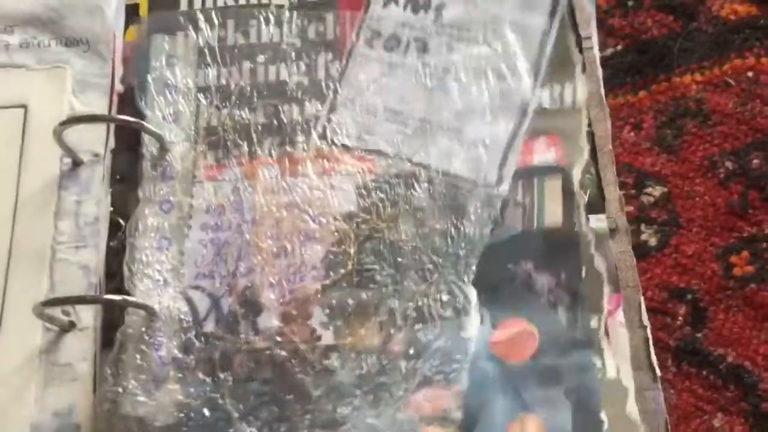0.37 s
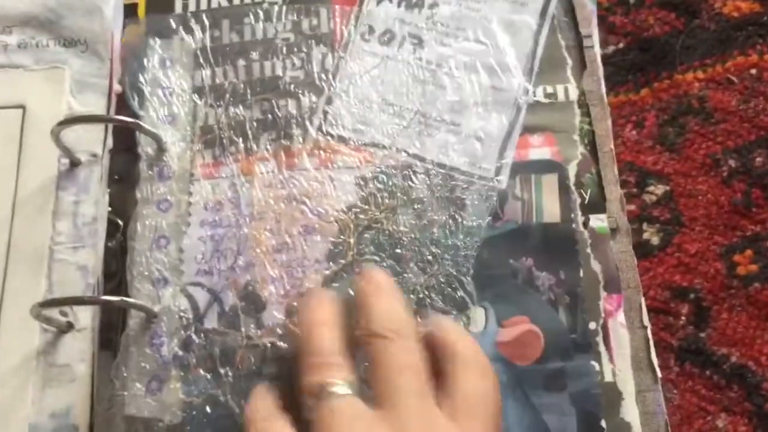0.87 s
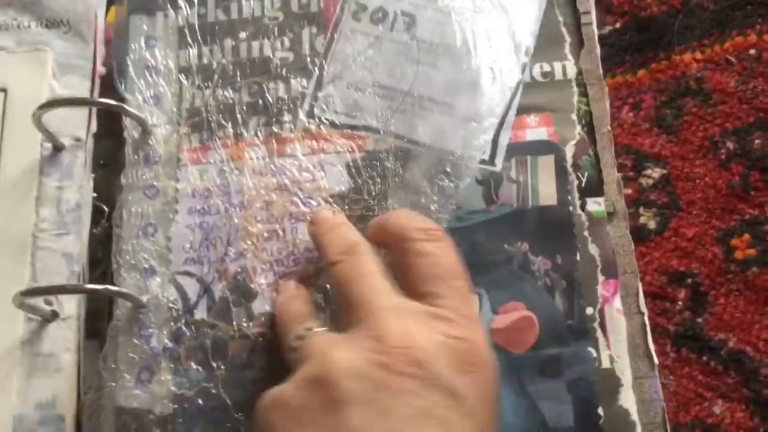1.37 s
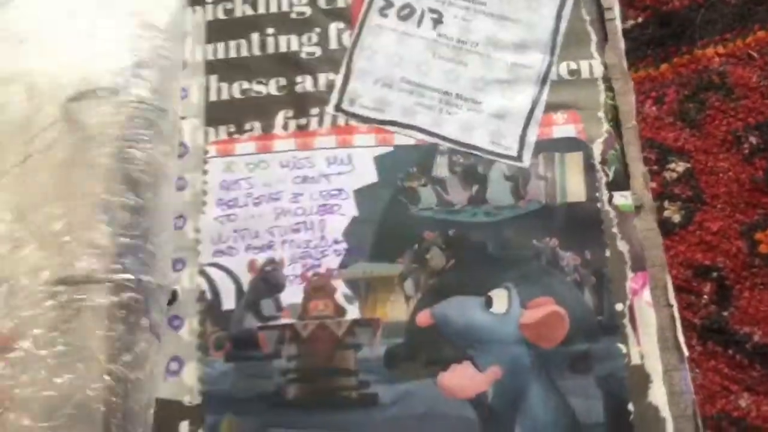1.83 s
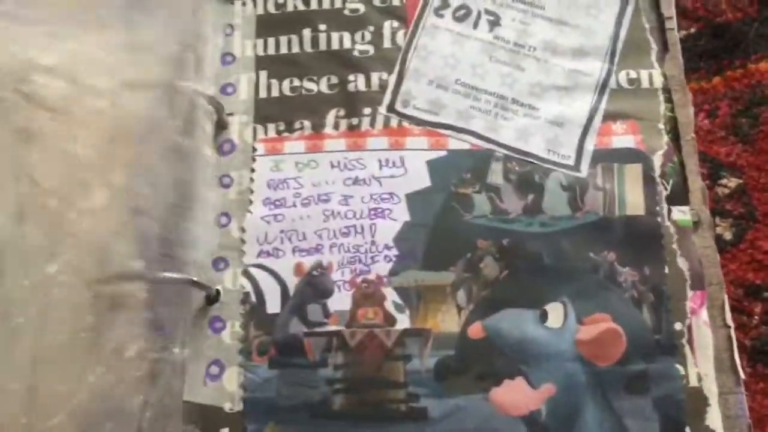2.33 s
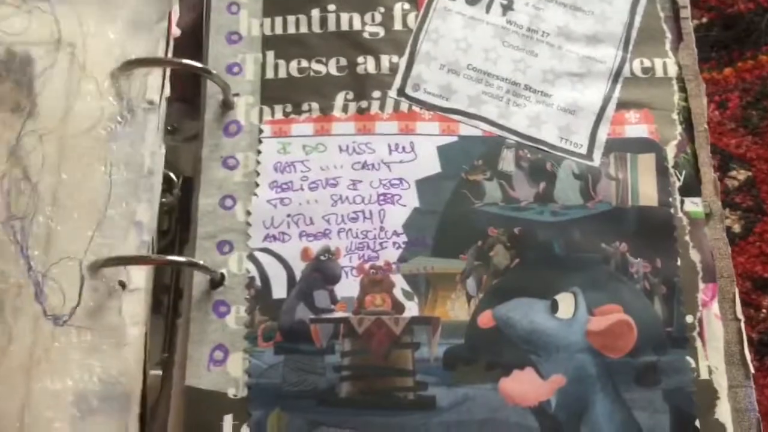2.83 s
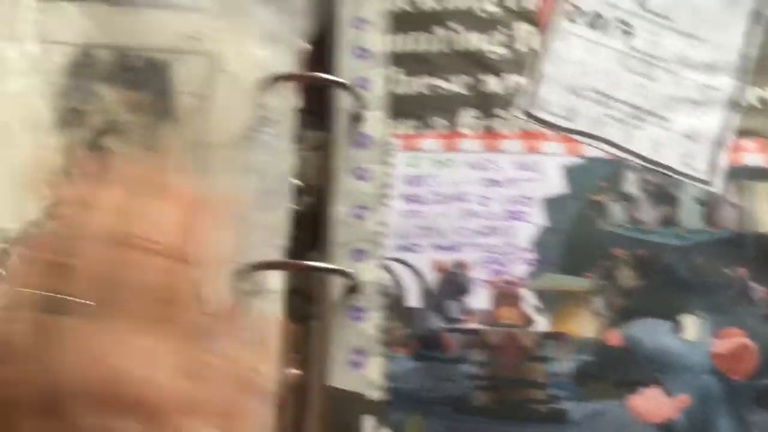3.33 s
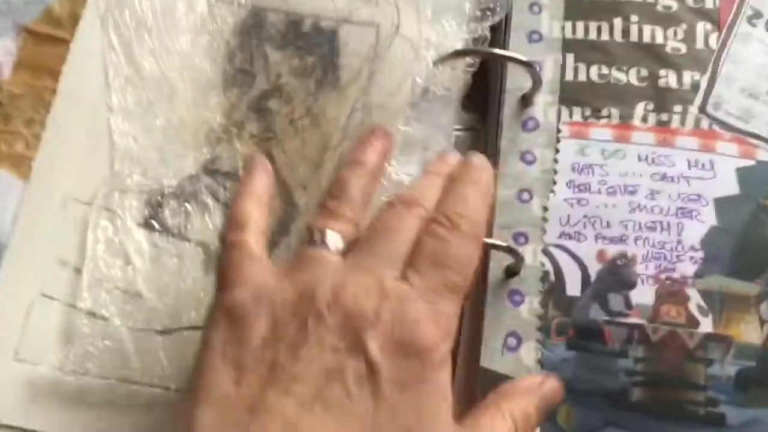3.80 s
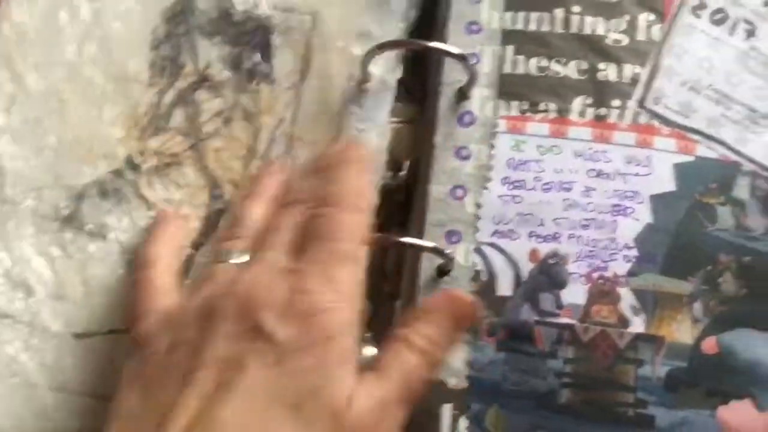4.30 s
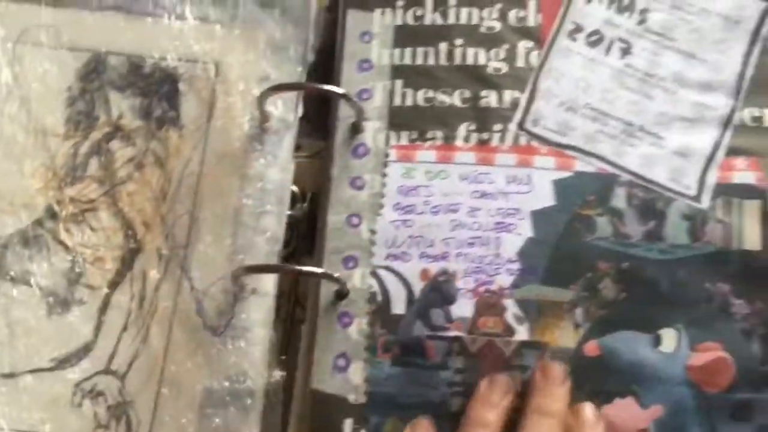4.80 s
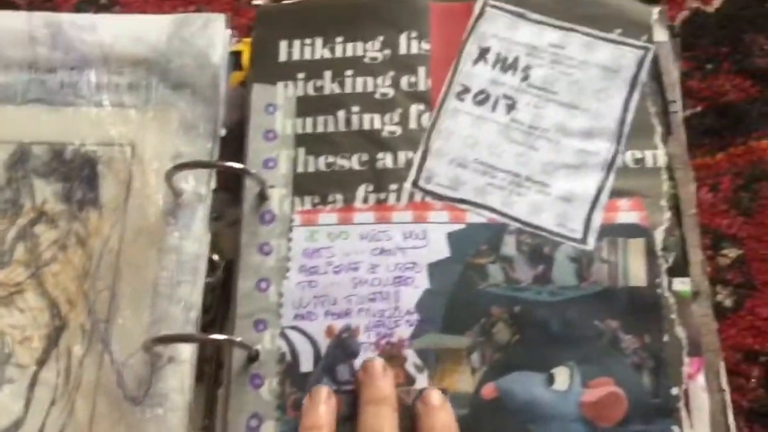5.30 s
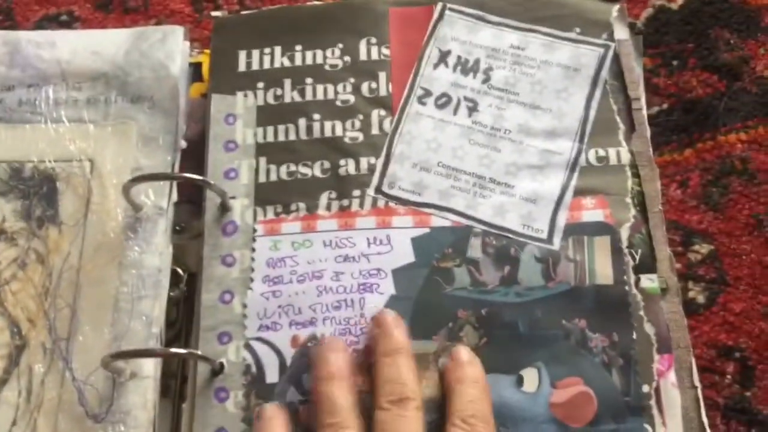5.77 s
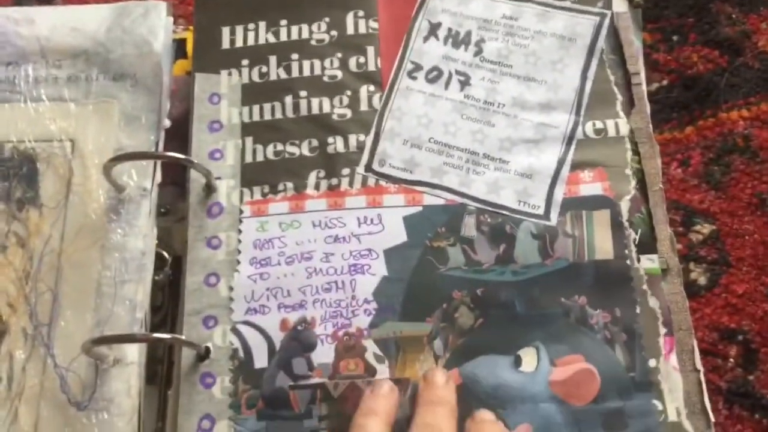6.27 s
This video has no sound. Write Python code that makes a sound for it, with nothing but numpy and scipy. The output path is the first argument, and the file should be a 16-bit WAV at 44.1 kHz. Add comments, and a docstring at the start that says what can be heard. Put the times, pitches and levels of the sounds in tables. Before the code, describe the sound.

A quiet, softly furnished small room with a faint steady hush, heard close through a phone. From 0 s crinkly plastic rustles lightly with small crackles and dull bumps, growing to a very loud, sharp snap at 0.6 s, by far the strongest moment. It drops to faint crinkles until 1.3 s, when fingers gather the sheet; a bright crackle marks the lift at 1.6 s. Around 1.9 to 2.1 s the page swings over with fuller rustling, and a crisp snap. Low soft thumps and lower crinkles follow at 2.3 to 2.8 s as it settles. After a lull, a hissing brush comes at 3.15 s, then a light bump at 3.5 s and pressing, smoothing crackles from 3.9 to 4.4 s. Quieter rubbing follows, with a soft airy stroke at 5.1 s, sparse ticks, a clearer crinkle at 6.05 s and small rustles to the end at about 6.6 s.

```python
"""A small quiet room, where crinkly plastic and paper pages in a ring binder are handled close to a phone.
They are lifted, turned and smoothed by hand. Rubbing noise rings the sheet to make it rustle, and finer
rubbing makes the fingers hiss. Creases snap as short pitched bursts with a sharp pop.
The heavy book flexes as low uneven noise and thumps as short low swings.
The room answers with a brief dull tail, over a steady hush."""
import sys
import numpy as np
from scipy import signal
from scipy.fft import rfft, irfft
from scipy.io import wavfile
from scipy.ndimage import uniform_filter1d

SR = 44100
rng = np.random.default_rng(int(sys.argv[2]) if len(sys.argv) > 2 else 0)


def makeup_ratio(level_db):
    """Linear amplitude ratio for a level in decibels (20 dB per factor of ten)."""
    decades = np.asarray(level_db, float) / 20
    return 10 ** decades


def dump_mix(stems):
    """Bounce the given channels to the path in sys.argv[1] as a 16-bit WAV at rate SR."""
    frames = np.atleast_2d(stems).T  # one column per channel
    limited = np.clip(frames, -1, 1)  # hard clip at full scale
    pcm = np.round(limited * 32767).astype(np.int16)
    wavfile.write(sys.argv[1], SR, pcm)


N = 292824
TIME = np.arange(N) / SR  # seconds

# colour of the steady hush: pitch_hz, relative level_db (per Hz)
AIR_COLOUR = [(18, -32.5), (30, -11.5), (61, -3), (173, 5), (606, -14), (691, -11.5), (1550, -15.5),
              (4540, -22), (13300, -23.5), (15500, -35.5)]
AIR_DB = -75
# bumps of the book: peak_s, peak_db (before the final filter), pitch_hz, rise_s, fall_s (both per 60 dB)
BOOK_THUMPS = [(0.052, -54.5, 320, 0.035, 0.098), (0.077, -46, 239, 0.026, 0.064),
               (0.196, -36, 294, 0.012, 0.012), (0.291, -40.5, 315, 0.0083, 0.011),
               (0.434, -30.5, 296, 0.052, 0.018), (0.502, -42, 270, 0.0098, 0.087),
               (0.572, -40, 366, 0.022, 0.014), (0.596, -25, 360, 0.018, 0.021),
               (0.603, -35, 177.7, 0.015, 0.1), (0.999, -53, 282, 0.053, 0.013),
               (1.045, -53, 190, 0.11, 0.023), (1.14, -54.6, 198, 0.044, 0.068),
               (1.329, -46.5, 202, 0.012, 0.037), (1.577, -40.5, 357, 0.0092, 0.038),
               (1.634, -54.5, 215.0, 0.015, 0.024), (1.905, -36, 91.6, 0.033, 0.035),
               (1.935, -42.5, 426, 0.078, 0.053), (1.953, -34, 109, 0.0083, 0.016),
               (2.012, -39.5, 91, 0.11, 0.11), (2.059, -39.5, 91.6, 0.029, 0.027),
               (2.176, -53, 102.0, 0.045, 0.05), (2.278, -33.5, 147, 0.011, 0.03),
               (2.39, -26.5, 179, 0.027, 0.026), (2.437, -54, 192, 0.023, 0.025),
               (2.46, -34, 184, 0.01, 0.02), (2.573, -46, 81.3, 0.039, 0.014),
               (2.667, -45, 151.0, 0.033, 0.018), (2.704, -25, 106, 0.013, 0.02),
               (2.818, -50, 128, 0.069, 0.051), (3.102, -49, 95, 0.042, 0.021),
               (3.149, -58, 99.3, 0.12, 0.14), (3.467, -39.5, 173.7, 0.013, 0.018),
               (3.508, -50, 99.7, 0.12, 0.023), (3.637, -50, 288, 0.026, 0.045),
               (3.681, -52, 205, 0.024, 0.053), (3.913, -56, 482, 0.0097, 0.016),
               (3.949, -41, 550, 0.034, 0.014), (4.157, -56.5, 211, 0.041, 0.013),
               (4.273, -49, 472, 0.023, 0.012), (4.651, -47.5, 172.7, 0.042, 0.021),
               (4.666, -58, 75, 0.04, 0.08), (6.054, -55, 380, 0.046, 0.011),
               (6.315, -49, 205.0, 0.027, 0.025), (6.423, -46, 362, 0.014, 0.014),
               (6.563, -51.5, 299, 0.025, 0.038)]
# pushes that flex the pages and cover: peak_s, level_db, rise_s, fall_s (both per 20 dB), deep_share_db
BOOK_PUSHES = [(0.07, -63.5, 0.087, 0.18, -20), (0.2, -61, 0.022, 0.023, -15),
               (0.308, -59.5, 0.083, 0.064, -21), (0.425, -42, 0.021, 0.012, -26),
               (0.451, -60, 0.11, 0.3, -18), (0.597, -44.6, 0.019, 0.073, -21),
               (0.734, -73.3, 0.18, 0.036, -8.3), (1.057, -69.5, 0.63, 0.031, -1),
               (1.136, -72, 0.04, 0.497, -9.0), (1.313, -60.5, 0.033, 0.095, -7.9),
               (1.596, -57.5, 0.13, 0.073, -4), (1.961, -49.5, 0.092, 0.066, -4),
               (2.056, -68, 0.053, 0.024, 15), (2.283, -68.5, 0.64, 0.092, 7),
               (2.286, -55, 0.021, 0.028, -1), (2.348, -57.5, 0.045, 0.23, 8.5),
               (2.388, -52, 0.058, 0.106, -4), (2.588, -71, 0.11, 0.023, 19),
               (2.673, -59, 0.032, 0.37, -4.2), (2.721, -49.5, 0.049, 0.016, -5),
               (3.087, -68, 0.069, 0.32, 7), (3.485, -53, 0.036, 0.052, 0.5),
               (3.686, -63.5, 0.088, 0.046, -3), (3.917, -61.5, 0.08, 0.06, -12),
               (4.184, -65.5, 0.16, 0.033, -14), (4.279, -66, 0.12, 0.24, -6),
               (4.651, -68.5, 0.025, 0.064, 4.2), (4.764, -70.5, 0.025, 0.12, -9),
               (4.95, -76.5, 0.027, 0.497, -2), (5.438, -71.5, 0.91, 0.7, -10),
               (5.653, -76.7, 0.033, 0.81, -7), (6.072, -66, 0.036, 0.087, -13.1),
               (6.35, -66.5, 0.17, 0.17, -14), (6.564, -67, 0.11, 0.36, -6)]
# strokes of skin and sheet over paper: peak_s, level_db, rise_s, fall_s (both per 20 dB), plastic_edge_db
RUB_STROKES = [(0.052, -58, 0.068, 0.086, -3.5), (0.191, -70.7, 0.172, 0.012, -4),
               (0.288, -54, 0.09, 0.086, -3.5), (0.416, -53.5, 0.086, 0.069, -0.5),
               (0.594, -37.5, 0.026, 0.032, 1.5), (0.624, -54.5, 0.16, 0.086, 1),
               (0.734, -74.5, 0.071, 0.016, 0.8), (0.938, -62, 0.22, 0.035, -4),
               (0.981, -66, 0.019, 0.086, -2), (1.143, -69.5, 0.1, 0.038, 0.5),
               (1.22, -76.5, 0.079, 0.039, -10), (1.32, -58.4, 0.034, 0.033, -1.5),
               (1.372, -60.5, 0.117, 0.11, 4.5), (1.471, -61, 0.021, 0.1, 2.0),
               (1.555, -63.0, 0.048, 0.146, 3.5), (1.583, -49, 0.023, 0.0074, 6.5),
               (1.816, -81, 0.022, 0.068, -1), (1.917, -54, 0.034, 0.14, -0.5),
               (2.032, -54.5, 0.0061, 0.11, -2.5), (2.239, -82, 0.018, 0.051, 2),
               (2.309, -53, 0.03, 0.016, 1.5), (2.341, -59, 0.031, 0.046, -1),
               (2.412, -61.5, 0.073, 0.08, 4), (2.519, -73, 0.039, 0.1, 1.3), (2.585, -74, 0.02, 0.07, -2),
               (2.676, -66, 0.027, 0.12, 4), (2.784, -68.5, 0.008, 0.12, 0.1),
               (2.98, -86, 0.059, 0.267, 1.3), (3.143, -53, 0.11, 0.065, -1.2),
               (3.248, -84.5, 0.05, 0.2, -0.6), (3.468, -64, 0.012, 0.184, -5.5),
               (3.559, -58.7, 0.07, 0.17, -6), (3.667, -60, 0.16, 0.019, -5),
               (3.817, -77, 0.068, 0.026, -13), (3.942, -50, 0.066, 0.037, 1.5),
               (4.051, -60, 0.1, 0.016, -5.5), (4.129, -53.5, 0.054, 0.046, -5),
               (4.273, -54.5, 0.03, 0.12, 1.5), (4.359, -58.5, 0.13, 0.047, -6),
               (4.589, -80, 0.013, 0.031, -10), (4.765, -71, 0.01, 0.13, -0.1),
               (4.905, -70, 0.14, 0.12, -4), (5.14, -51.5, 0.072, 0.12, -5.5),
               (5.327, -63, 0.02, 0.015, -3.5), (5.445, -62.5, 0.125, 0.31, -5.5),
               (5.864, -61, 0.16, 0.15, -3), (6.051, -57.5, 0.033, 0.28, 1.2),
               (6.318, -63, 0.052, 0.16, -2.5), (6.559, -60, 0.052, 0.495, -4)]
# creases that snap: peak_s, peak_db, pitch_hz, treble_db, fall_s (per 60 dB, at least 0.001)
CREASE_SNAPS = [(0.0496, -40.5, 1810, -4, 0.012), (.092, -40, 3230, 0.5, 0.0067),
                (.1878, -30, 1620, -15, .0093), (0.4281, -28, 1050, -2.5, 0.0091),
                (0.468, -40, 1180, -12, 0.029), (0.4786, -37, 1809, -17, .0082),
                (.5, -37.5, 1110, -27, .0075), (0.534, -38.5, 4468, 9, .0095),
                (0.575, -28, 2060, -10, 0.0083), (0.595, -7, 2580, -8, 0.00094),
                (0.5985, -13.5, 3650, -5, 0.016), (.8811, -47, 2260, -2, 0.028),
                (.949, -38, 4366, 17, 0.0056), (.979, -46, 1437, 2.5, .007), (0.9836, -45, 4100, -4, .003),
                (0.9902, -43.5, 2020, -1, 0.038), (1.0451, -52, 1280, -19, .0087),
                (1.0492, -44, 3150, -11, .003), (1.0838, -53, 2046, -11.5, .006),
                (1.1466, -48, 1170, -22, 0.0077), (1.201, -53, 1125, 3, .0038),
                (1.314, -36, 1390, -7.5, 0.0067), (1.3243, -35.5, 1620, -12, 0.024),
                (1.33, -37, 2760, -6, 0.0069), (1.462, -40, 2450, -6.5, 0.052),
                (1.5107, -38.5, 2860, -5, 0.01), (1.5353, -39, 1640, -30, .007),
                (1.5451, -39, 1400, -14, 0.013), (1.5751, -25, 2930, -0.5, 0.0091),
                (1.583, -28, 2800, -5, 0.019), (1.647, -42, 5873, 6, .0045),
                (1.7203, -50, 3600, -14, 0.0063), (1.8152, -43, 1110, -40, 0.0081),
                (1.8673, -50, 1110, -12, .018), (1.884, -45, 1114, -22, .016),
                (1.9049, -36, 1080, -20, 0.012), (1.9151, -35, 1430, -14, 0.0031),
                (2.0377, -36, 3250, 0, 0.079), (2.053, -20, 3600, -1.5, 0.014),
                (2.1385, -45.5, 2283, -1.5, 0.018), (2.179, -57, 2019, -4, .023),
                (2.242, -47.5, 1922, -12, .008), (2.2706, -44, 1007, -34, .016),
                (2.2835, -42, 1141, -3, .036), (2.31, -31.5, 1020, -7, 0.029),
                (2.3406, -30, 1370, -38, 0.015), (2.3452, -31, 1290, 3, 0.0037),
                (2.4253, -39, 1427, -1, 0.0055), (2.4599, -40, 816, -36, 0.011), (2.58, -52, 1740, 0, .018),
                (2.6603, -41, 910, -28, .011), (2.7027, -33.5, 855, -40, .0084),
                (2.7533, -43, 1087, -35, .006), (2.7908, -46, 1370, -9, .03),
                (2.8, -39.5, 1150, -48, 0.045), (2.8202, -34.5, 1290, -42, 0.0035),
                (2.8304, -39, 1190, -47, 0.013), (2.9007, -57.5, 2750, -3, .003),
                (2.947, -50.5, 2300, -24, 0.01), (2.9585, -50, 2280, -23, 0.0031),
                (2.9802, -48, 2260, -1.5, 0.0085), (3.154, -30.5, 3700, -19, .0041),
                (3.2119, -49.5, 4310, 12.5, 0.0021), (3.467, -36, 1753, 1, .003),
                (3.6663, -33, 1500, 0.5, .014), (3.85, -51, 1620, -30, 0.02),
                (3.8637, -47, 1690, -23, 0.011), (3.9161, -24.5, 1680, -2, 0.0043),
                (3.9328, -32, 1810, -1, 0.0073), (3.9405, -29, 5400, -30, 0.0023),
                (3.9471, -28, 1630, -15, 0.0042), (3.9743, -40, 1300, 0, 0.0044),
                (4.0483, -40, 6200, -12, .0054), (4.098, -35.5, 1560, 0, 0.015),
                (4.14, -32.5, 1650, 7, 0.014), (4.1496, -34.5, 1669, -1, 0.012),
                (4.227, -49, 2230, -7, 0.0099), (4.2467, -45, 1730, -7, 0.014),
                (4.2715, -34, 1990, -8, 0.016), (4.2802, -47, 2240, -13, 0.0099),
                (4.3226, -42, 2200, -11, .018), (4.342, -34, 4540, -32, 0.0077),
                (4.3477, -29, 5900, 15.5, 0.0022), (4.7622, -45, 3080, -7.5, .011),
                (4.7697, -39, 1580, 0.5, .003), (5.2822, -53.5, 1588, -5, .006),
                (5.3282, -45, 2160, -3, .03), (5.5695, -50.5, 2590, -7, .017),
                (5.733, -52, 1986, -13, .008), (5.7475, -49, 1642, -4, .007), (5.793, -51, 1940, -4, .012),
                (5.948, -41.5, 1860, 0.5, 0.0056), (6.0481, -27, 1470, -12, .0087),
                (6.0773, -38, 2229, 6, 0.034), (6.1652, -48, 1470, 0, .0088),
                (6.1713, -40, 2170, -30, 0.012), (6.237, -39.5, 2450, -9, 0.017),
                (6.311, -38.5, 2350, -3, 0.019), (6.3678, -44.5, 2130, -1, .029)]
# bends and drags of the sheet: peak_s, level_db, rise_s, fall_s (both per 20 dB), taut_upper_modes_db
SHEET_BENDS = [(0.05, -56, 0.14, 0.13, -8), (0.194, -63, 0.087, 0.02, -4.5), (0.281, -53, 0.091, 0.083, -4),
               (0.441, -53, 0.17, 0.034, -2), (0.468, -49, 0.011, 0.12, -5.5),
               (0.572, -47.5, 0.0064, 0.14, 6.5), (0.601, -31, 0.035, 0.013, 1.5),
               (0.885, -73, 0.23, 0.032, 6), (0.934, -62.5, 0.025, 0.036, 2),
               (0.988, -61.5, 0.03, 0.034, -4), (1.047, -59, 0.026, 0.012, -4.5),
               (1.145, -55.5, 0.069, 0.026, -1.3), (1.192, -87.5, 0.497, 0.018, -2),
               (1.326, -52, 0.067, 0.031, 2.2), (1.355, -64, 0.14, 0.31, 6), (1.461, -55, 0.013, 0.14, 3.5),
               (1.537, -56.5, 0.011, 0.17, 1), (1.579, -40.5, 0.017, 0.0091, 2.5),
               (1.71, -77, 0.131, 0.54, -4.5), (1.817, -60.5, 0.015, 0.013, -16),
               (1.911, -45, 0.035, 0.13, -3), (2.038, -58, 0.013, 0.13, 4), (2.117, -57.5, 0.034, 0.02, -1),
               (2.189, -70, 0.029, 0.022, -11), (2.248, -73, 0.08, 0.011, -2),
               (2.299, -50.5, 0.028, 0.29, -4), (2.475, -74, 0.2, 0.017, -1),
               (2.584, -66.5, 0.029, 0.075, -0.5), (2.688, -51, 0.046, 0.14, -7.5),
               (2.815, -49.5, 0.05, 0.052, -15), (2.951, -64.5, 0.033, 0.137, -6),
               (3.14, -51, 0.099, 0.053, 7), (3.358, -79, 0.497, 0.11, -3), (3.468, -64, 0.012, 0.31, -4),
               (3.521, -69.5, 0.072, 0.37, 9), (3.667, -59.5, 0.031, 0.012, 5),
               (3.922, -47.5, 0.089, 0.081, -5.5), (4.145, -52.5, 0.16, 0.033, -1),
               (4.276, -52, 0.047, 0.084, -3), (4.598, -78, 0.019, 0.044, -6.5),
               (4.798, -66, 0.12, 0.077, 0), (4.85, -71, 0.016, 0.42, -1.5), (5.107, -70, 0.07, 0.363, 7.5),
               (5.33, -62.5, 0.064, 0.012, -5), (5.5, -71.5, 0.27, 0.118, 6.5),
               (5.572, -68, 0.061, 0.036, 0), (5.597, -71.5, 0.0077, 0.22, 1.7),
               (5.75, -66.5, 0.05, 0.052, -2), (5.79, -64.5, 0.024, 0.033, -11),
               (5.883, -73.5, 0.11, 0.024, 16.5), (5.944, -64, 0.007, 0.4, -8),
               (6.055, -47, 0.031, 0.097, 0), (6.169, -62, 0.024, 0.022, 6), (6.246, -68, 0.495, 0.0099, 1),
               (6.269, -65, 0.017, 0.015, -8), (6.363, -63, 0.14, 0.054, 6.5),
               (6.444, -66.5, 0.261, 0.03, -4.5), (6.565, -58, 0.083, 0.32, -1.9)]
# how the sheet is held: time_s, slack_lower_modes_db, long_span_pitch_hz, short_span_pitch_hz, rub_sheen_db
SHEET_GRIP = [(0.0, -11, 1647, 2678, -2), (0.4, -6, 1633, 2930, 2.5), (0.6, -8, 1600, 2900, -3),
              (1.0, -14, 1600, 3030, 4.5), (1.08, -8, 1550, 3280, 5), (1.14, -7.5, 1515, 4200, 1),
              (1.2, -9, 1500, 3600, 4), (1.29, -12, 1500, 3474, 3), (1.36, -15, 1663, 2900, -2.5),
              (1.52, -16, 1770, 2920, 0), (1.6, -12.5, 1720, 2790, 6.5), (1.8, 4, 1217, 2917, 1.5),
              (2.1, -10.5, 1300, 3050, -1), (2.3, 2.5, 1180, 2615, -2.5), (2.85, -6, 1286, 2480, 2.5),
              (3.05, -7, 1700, 2687, 2.5), (3.17, -14.5, 1750, 3830, 2.5), (3.25, -8, 1700, 2810, 2),
              (3.5, -4, 1678, 2900, 4), (3.9, -7.5, 1655, 2846, -7), (4.12, -11, 1711, 2560, -2),
              (4.28, -10.5, 1960, 2520, -6), (4.75, -5, 1500, 2740, 1.5), (5.15, -11.5, 1842, 3250, 2.5),
              (5.75, -4.5, 1666, 2660, 3.5), (6.07, -14, 1780, 2617, 3), (6.36, -10, 2120, 2294, 2),
              (6.64, -16, 1940, 2403, 2.5)]

# Broad modes (ways of ringing). Columns of all six: pitch_hz, width_hz (before sheet() widens it), level_db
# the sheet where it hangs slack
SLACK_MODES = [(417, 110, -5), (591, 89, 0), (675, 120, 3), (761.3, 160, -0.1)]
# the sheet's long free span
MIDDLE_MODES = [(980, 230, 0), (1180, 250, -1), (1400, 280, -1), (1620, 300, 0), (1850, 320, 0),
                (2100, 340, 0)]
# the sheet's short, tight free span
TAUT_MODES = [(2380, 380, 0), (2700, 400, 0), (3050, 440, -1), (3420, 480, -1), (3830, 520, -1),
              (4300, 560, -1), (4800, 600, -2), (5350, 640, -3)]
# the soft hiss of rubbing
SKIN_MODES = [(6800, 600, 0), (7500, 600, 0), (8250, 650, 0), (9050, 700, 0)]
# the sheen on top of the hiss
SHEEN_MODES = [(9900, 800, 0), (10900, 850, -.5), (12000, 900, -1.5), (13150, 950, -2.5), (14350, 1000, -5)]
# the lower rasp of the stiff plastic edge
EDGE_MODES = [(2600, 500, -12), (3200, 550, -9), (3900, 650, -5), (4700, 600, 0), (5400, 550, 0),
              (6100, 550, 0)]

ROOM_T60_S, ROOM_DB, ROOM_TOP_HZ = 0.089, -18.5, 4060
BASS_CUT_HZ, TOP_CUT_HZ = 48.4, 15200
ROUNDNESS = 1.34  # power of time along which a movement fades
LIMP_DB, PULL_DB = -71.5, 14.5  # the sheet is limp below this level, fully stretched this much above it
# slips before a pop rise 60 dB over this long, plus this share of the snap's fall time
SNAP_RISE_S, SNAP_RISE_SHARE = 0.0051, 0.24


def unit(x):
    """Scale to an rms (average strength) of 1."""
    return x / np.sqrt(np.mean(x ** 2))


def read(table):
    """Draw lines between the rows of a table, giving each column one value a sample."""
    s, *columns = np.transpose(table)
    return [np.interp(TIME, s, column) for column in columns]


def band(x, lo_hz, hi_hz, order=2):
    """Keep the sound between two pitches with a Butterworth filter."""
    sos = signal.butter(order, [lo_hz, min(hi_hz, 0.45 * SR)], "band", fs=SR, output="sos")
    return signal.sosfilt(sos, x)


def resonate(x, hz, width_hz):
    """A two-pole resonance applied twice, with gain 1 at its centre."""
    b, a = signal.iirpeak(hz, hz / width_hz, fs=SR)
    return signal.lfilter(b, a, signal.lfilter(b, a, x))


def walk(rate):
    """A random wandering level: a new value every 1 / rate seconds, smoothed twice."""
    hold = max(int(SR / rate), 1)
    steps = np.repeat(rng.standard_normal(N // hold + 1), hold)
    smooth = uniform_filter1d(uniform_filter1d(steps, hold), hold)
    return 0.8 * smooth[:N]


def swell(rise_s, fall_s, half):
    """Time around a peak and an envelope that rises and falls 60 dB in the given seconds."""
    t = np.arange(-half, half) / SR
    lasts = np.maximum(np.where(t < 0, rise_s, fall_s), 1e-3)
    return t, makeup_ratio(-60 * np.abs(t) / lasts)


def moves(table):
    """Overlapping movements add in power and the strongest sets the colour; gives level and colour in dB."""
    s, level_db, rise_s, fall_s, colour_db = np.transpose(table)[:, :, None]
    t = TIME[::64]  # slow curves need few points
    lasts = np.maximum(np.where(t < s, rise_s, fall_s), 1e-3)
    fade_db = 20 * (np.abs(t - s) / lasts) ** ROUNDNESS
    power = makeup_ratio(2 * (level_db - fade_db)) + 1e-30
    total = power.sum(axis=0)
    colour = (power * colour_db).sum(axis=0) / total
    return np.interp(TIME, t, 10 * np.log10(total)), np.interp(TIME, t, colour)


def friction(rate, spread_db, crackle_db, flutter_db):
    """Smooth rubbing noise plus tiny buckles (rate a second), of which a few are much larger."""
    hit, size, rub = rng.random(N), rng.exponential(size=N), rng.standard_normal(N)
    buckles = (hit < rate / SR) * np.sign(rub) * makeup_ratio(spread_db * size)
    rough = rub + makeup_ratio(crackle_db) * unit(buckles)
    return unit(rough * makeup_ratio(flutter_db * walk(70)))


def sheet(drive, modes, patchy_db, rate, span_hz=None, focus_db=0):
    """The sheet keeps changing shape, so each mode comes and goes; those near the free span's pitch lead."""
    out, power = 0, 0
    for k, (hz, width_hz, db) in enumerate(modes):
        octaves_off = 0 if span_hz is None else np.log2(hz / span_hz)
        lead = makeup_ratio(db - focus_db * octaves_off ** 2)
        ring = unit(resonate(drive, hz, 1.75 * width_hz))
        side = (-1) ** k  # neighbours swing in opposition
        out = out + side * lead * makeup_ratio(patchy_db * walk(rate)) * ring
        power = power + lead ** 2
    return unit(out / np.sqrt(power))


def air():
    """Steady hush of the room and the microphone: random noise given a fixed colour."""
    hz = np.arange(N // 2 + 1) * SR / N + 1
    colour_hz, colour_db = np.transpose(AIR_COLOUR)
    shape_db = np.interp(np.log(hz), np.log(colour_hz), colour_db)
    hush = irfft(rfft(rng.standard_normal(N)) * makeup_ratio(shape_db), N)
    return makeup_ratio(AIR_DB) * unit(hush)


def room(x):
    """Soft furnishings give a short, dull, diffuse tail."""
    t = np.arange(SR // 2) / SR
    noise = band(rng.standard_normal(len(t)), 81, ROOM_TOP_HZ, order=1)
    tail = noise * makeup_ratio(-60 * t / ROOM_T60_S) * (t > 0.004)  # the first 4 ms are silent
    tail = tail / np.sqrt(np.sum(tail ** 2))
    return makeup_ratio(ROOM_DB) * signal.fftconvolve(x, tail)[:N]


def thumps():
    """A soft push on the book sets off one low, damped swing."""
    out, half = np.zeros(N + SR), 2048
    phases = rng.random(len(BOOK_THUMPS))
    for (s, peak_db, hz, rise_s, fall_s), phase in zip(BOOK_THUMPS, phases):
        t, shape = swell(rise_s, fall_s, half)
        swing = shape * np.sin(2 * np.pi * (hz * t + phase))
        i = int(s * SR)
        out[i - half:i + half] += makeup_ratio(peak_db) * swing
    return band(out[:N], 50, 900, order=1)


def flex():
    """Slow uneven pushes on the book excite its cover and, deeper, the whole stack."""
    level_db, deep_db = moves(BOOK_PUSHES)
    push = rng.standard_normal(N) * makeup_ratio(2.5 * walk(25))
    cover = unit(band(push, 95, 360))
    stack = makeup_ratio(deep_db) * unit(band(push, 55, 120))
    return makeup_ratio(level_db) * (cover + stack)


def slide():
    """Fine, dense friction: a soft hiss with a sheen on top; the stiff plastic edge adds a lower rasp."""
    level_db, edge_db = moves(RUB_STROKES)
    sheen_db = read(SHEET_GRIP)[-1]
    drive = friction(rate=1100, spread_db=3.5, crackle_db=-7.5, flutter_db=3.1)
    rasp = makeup_ratio(edge_db) * sheet(drive, EDGE_MODES, patchy_db=2.0, rate=30)
    hiss = sheet(drive, SKIN_MODES, patchy_db=2.0, rate=30)
    sheen = makeup_ratio(sheen_db) * sheet(drive, SHEEN_MODES, patchy_db=2.0, rate=30)
    return makeup_ratio(level_db) * (rasp + hiss + sheen)


def snaps():
    """Each crease gives way in quick slips around one sharp pop, coloured by the patch that buckles."""
    out, half = np.zeros(N), 1024
    all_slips = rng.standard_normal((len(CREASE_SNAPS), 2 * half))
    for (s, peak_db, hz, treble_db, fall_s), slips in zip(CREASE_SNAPS, all_slips):
        t, shape = swell(SNAP_RISE_S + SNAP_RISE_SHARE * fall_s, fall_s, half)
        kick = shape * slips + 3.3 * (t == 0)  # the pop is one strong click at the peak
        # a duller crease is also more purely pitched
        body = makeup_ratio(2.5 + 0.41 * treble_db) * unit(band(kick, 480, 4800))
        ring = unit(resonate(kick, hz, 0.62 * hz)) + body
        treble = unit(band(band(kick, 3500, 21000), 2400, 7300, order=1))
        snap = unit(ring) + makeup_ratio(treble_db) * treble
        i = int(s * SR)
        out[i - half:i + half] += makeup_ratio(peak_db) * snap / np.abs(snap).max()
    return out


def rustle():
    """Friction rings the sheet; tension shifts the weight between its low and high modes."""
    level_db, taut_db = moves(SHEET_BENDS)
    slack_db, long_hz, short_hz, _ = read(SHEET_GRIP)
    # a firm movement stretches the span and sharpens its pitch
    pull = np.clip((level_db - LIMP_DB) / PULL_DB, 0, 1)
    drive = friction(rate=730, spread_db=2.5, crackle_db=1.0, flutter_db=1.0)
    slack = makeup_ratio(slack_db) * sheet(drive, SLACK_MODES, patchy_db=3.0, rate=25)
    middle = sheet(drive, MIDDLE_MODES, patchy_db=3.5, rate=35, span_hz=long_hz, focus_db=5.0 + 7.1 * pull)
    taut = sheet(drive, TAUT_MODES, patchy_db=6.5, rate=35, span_hz=short_hz, focus_db=33 * pull)
    return makeup_ratio(level_db) * (slack + middle + makeup_ratio(taut_db) * taut)


def scene():
    """Pages and book close by, their echo, and the quiet air."""
    book = rustle() + slide() + flex() + snaps() + thumps()
    return (book + room(book) + air())[None]


def band_limit(x):
    """A steep low-pass at the top of the band."""
    return signal.sosfilt(signal.butter(12, 15780, fs=SR, output="sos"), x)


def record(dry):
    """The phone cuts the deep bass gently and the top steeply."""
    bass_cut = signal.butter(2, BASS_CUT_HZ, "high", fs=SR, output="sos")
    top_cut = signal.ellip(8, 0.2, 60, TOP_CUT_HZ, fs=SR, output="sos")
    mix = signal.sosfilt(top_cut, signal.sosfilt(bass_cut, dry))
    return band_limit(mix)


dry = scene()
out = record(dry)
dump_mix(out)
```